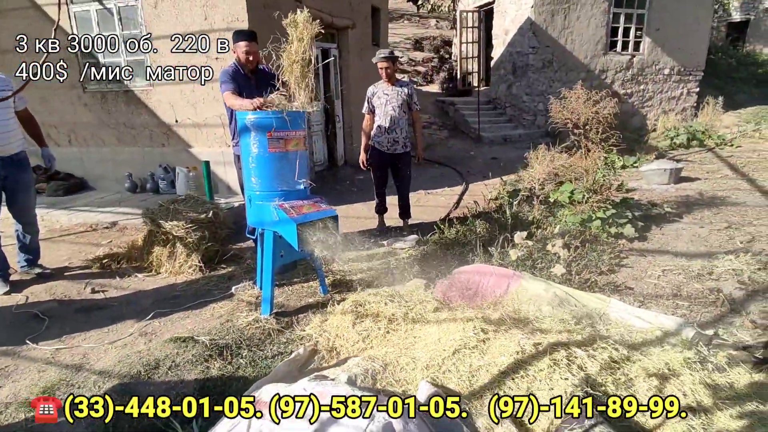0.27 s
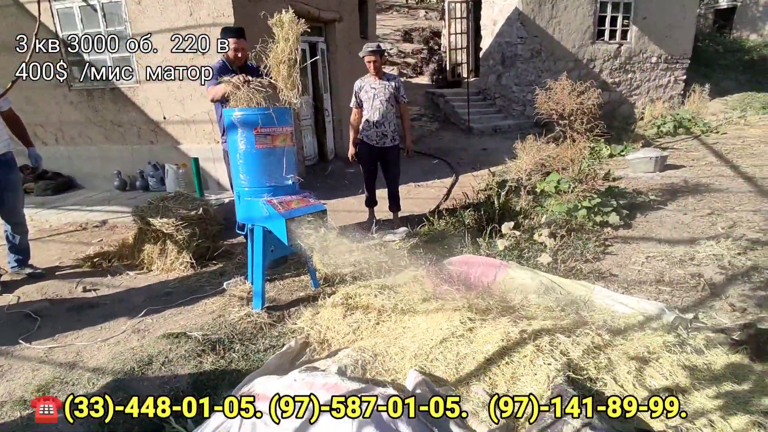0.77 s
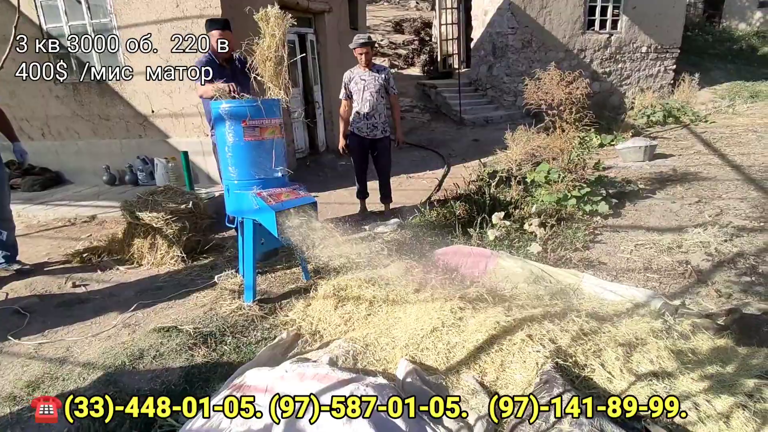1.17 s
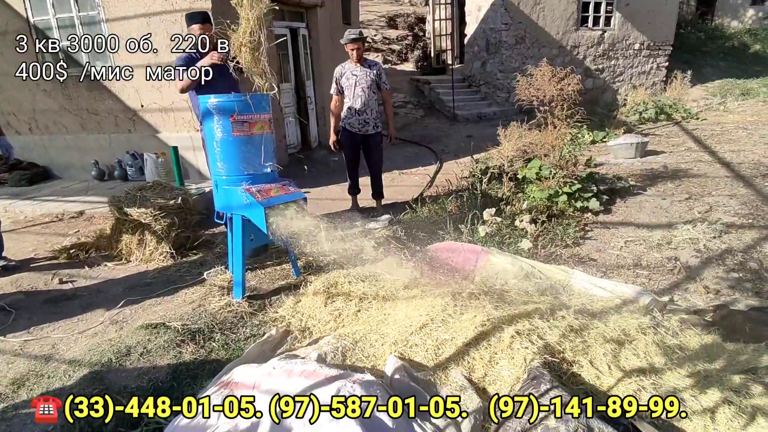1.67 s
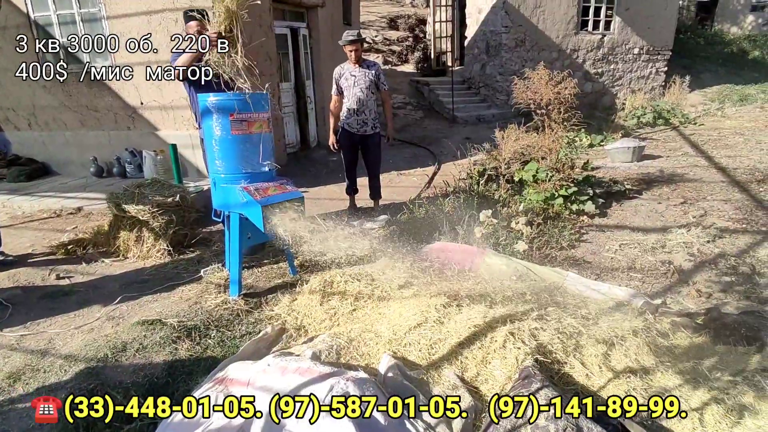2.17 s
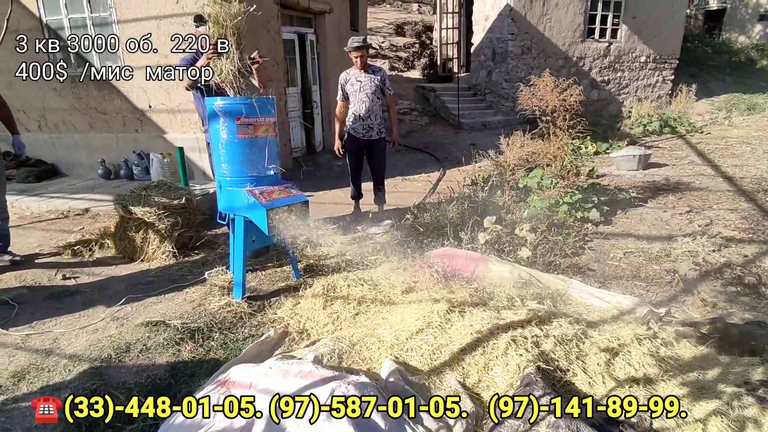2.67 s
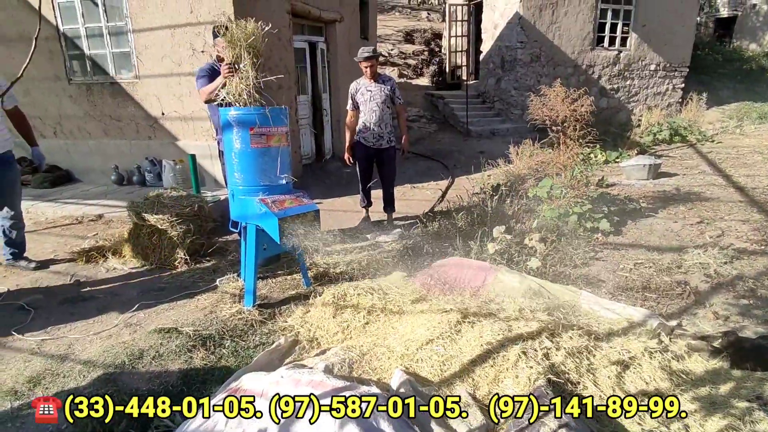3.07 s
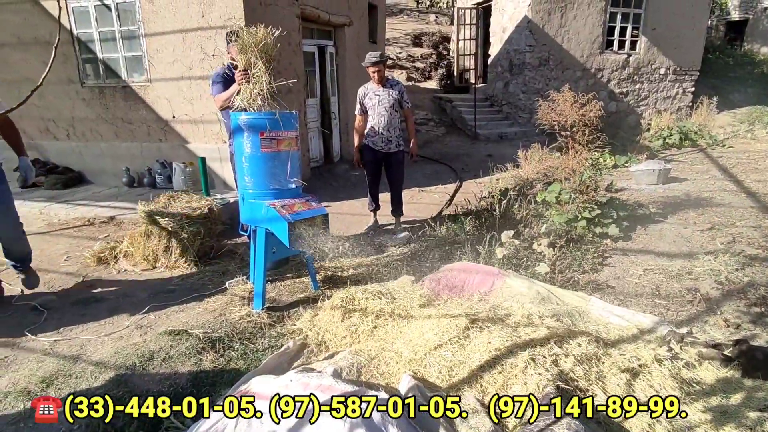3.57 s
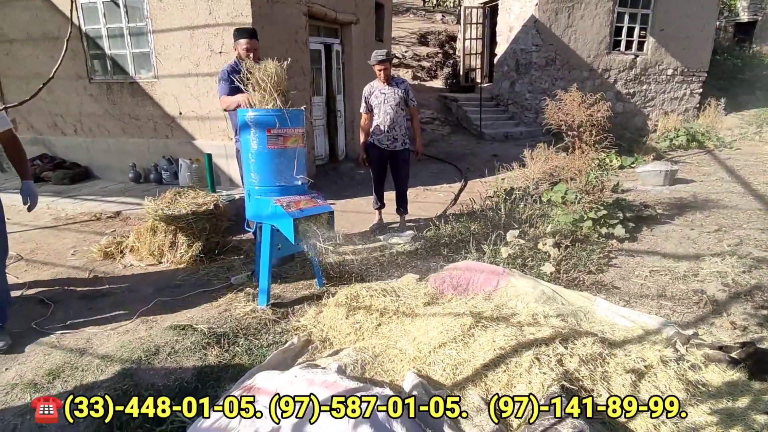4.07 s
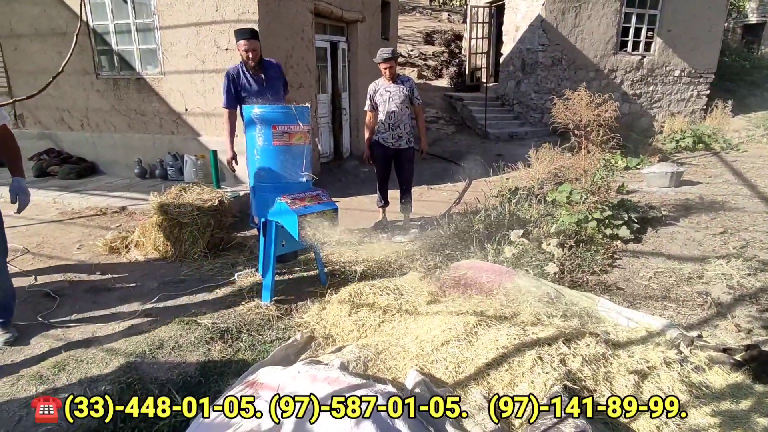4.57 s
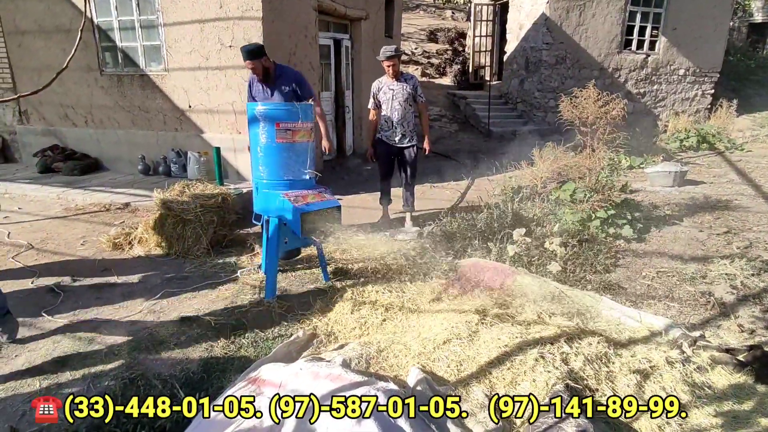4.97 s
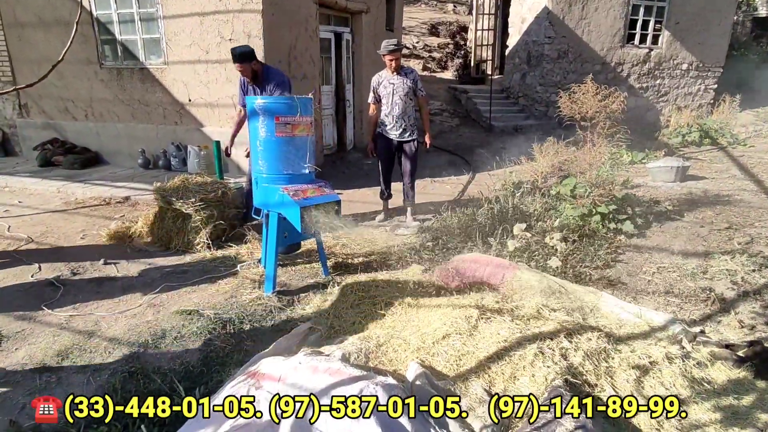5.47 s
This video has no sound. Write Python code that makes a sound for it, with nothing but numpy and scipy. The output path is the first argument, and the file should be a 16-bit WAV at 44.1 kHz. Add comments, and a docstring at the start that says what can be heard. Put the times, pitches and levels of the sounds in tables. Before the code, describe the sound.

A few metres away in an open yard, an electric straw chopper runs throughout with a tonal motor whine and a hollow steel-drum roar. Bright, dry hiss surges as tufts go in, with crunching, clicks and sharp snaps. The pitch sags near two seconds, recovers around three and dips again after four and a half. Wind rumbles and thumps a hand-held stereo microphone, especially on the right.

```python
"""Straw chopper in a yard

An electric straw chopper a few metres from a two-port microphone, in a breeze. Rotor: tones on multiples of a
shaft speed that sags as bundles are fed in. Drum: noise ringing in steel. Straw: ticking noise for chaff and
crushed stalks, short clicks for splinters, noise bursts for snaps. Wind: low noise in gusts, different at each
port, with sharp eddies thumping the right one."""
import sys
import numpy as np
from scipy import signal
from scipy.fft import rfft, irfft
from scipy.io import wavfile

SR = 44100
rng = np.random.default_rng(int(sys.argv[2]) if len(sys.argv) > 2 else 0)


def file_out(sig):
    """Save sig as 16-bit WAV at sys.argv[1]."""
    # one column per channel
    cols = np.atleast_2d(sig).T
    # limit, then scale
    lim = np.clip(cols, -1, 1)
    pcm = np.round(lim * 32767).astype(np.int16)
    wavfile.write(sys.argv[1], SR, pcm)


N = 251811
T, HZ = np.arange(N) / SR, np.fft.rfftfreq(N, 1 / SR)


def gain_of(db):
    """Decibels to amplitude."""
    return 10 ** (np.asarray(db) / 20)


def evened(x):
    """Scales to an rms of 1."""
    return x / np.sqrt(np.mean(x ** 2) + 1e-20)


def curves(rows):
    """Each column of a time table at every sample."""
    s, *columns = np.transpose(rows)
    return [np.interp(T, s, c) for c in columns]


def spectra(rows):
    """Each column of a frequency table at every bin, interpolated over log frequency."""
    hz, *columns = np.transpose(rows)
    return [np.interp(np.log(HZ + 1), np.log(hz), c) for c in columns]


def coloured(x, gain):
    """Filters by a gain per bin."""
    return irfft(rfft(x) * gain, N)


def bell(hz, width_hz):
    """Power response of one resonance."""
    return 1 / (1 + (2 * (HZ - hz) / width_hz) ** 2)


def wander(rate_hz):
    """Slow chance of rms 1, up to about a given rate."""
    return evened(coloured(rng.standard_normal(N), 1 / (1 + (HZ / rate_hz) ** 4)))


def sides(pan_db):
    """Left and right gains of equal total power, for a left-right difference in dB."""
    pair = np.array([gain_of(pan_db / 2), gain_of(-pan_db / 2)])
    return pair / np.sqrt(np.mean(pair ** 2, 0))


def swell(start, length, attack_s, release_s):
    """Rises, holds until its length is over, and dies away."""
    age = T - start
    return np.clip(age / attack_s, 0, 1) * np.exp(-np.clip((age - length) / release_s, 0, 30))


def crackle(ticks_per_s, spread_db, tick_s, tick_share):
    """A pair of noises made partly of tiny ticks at shared moments: many faint, a few strong."""
    struck = rng.random(N) < ticks_per_s / SR
    size = gain_of(spread_db * np.minimum(rng.exponential(1, N), 4)) * struck
    ticks = signal.lfilter([1], [1, -np.exp(-2 / (tick_s * SR))], size ** 2)  # power of decaying ticks
    share = np.clip(tick_share, 0, 1)
    power = 1 - share + share * ticks / ticks.mean()
    return np.sqrt(power) * rng.standard_normal((2, N))


# the two ports of the microphone at the usual lag:
# (frequency [Hz], likeness [0-1], phase by which left leads [radians], left-right level [dB])
PORT_PAIR = [(100, .9, -.2, -2), (300, .95, -.25, -.5), (560, .92, -.85, -2), (900, .92, -1, -1.5),
             (1170, .8, -1.6, 3), (1400, .72, -2.2, -1), (1900, .62, -3.1, 0), (2200, .62, -6.1, 0),
             (2750, .2, -7.6, -.5), (3100, .45, -8.9, 0), (3330, .995, -9.35, 0), (3600, 1, -9.42, 0),
             (3880, .995, -9.5, 0), (4250, .45, -9.9, 0), (4800, .25, -10.8, 0), (5800, .43, -12.6, 0),
             (9500, .08, -14, 0)]


def at_ports(pair, lag, diffuse=1, widest_phase=np.inf):
    """Direct sound reaches the right port first, by a drifting lag; scattered sound differs between ports."""
    hz, s, (direct, scattered) = signal.stft(pair, SR, nperseg=512, noverlap=384)
    stretch = np.interp(s, T, lag)
    at, *columns = np.transpose(PORT_PAIR)
    log_hz = np.log(hz[:, None] * stretch + 1)  # a longer lag slides the port pattern down in pitch
    likeness, phase, pan_db = [np.interp(log_hz, np.log(at), c) for c in columns]
    apart = diffuse * (1 - np.clip(likeness, 0, 1) ** 2)
    mixed = np.sqrt(1 - apart) * direct + np.sqrt(apart) * scattered
    right = mixed * np.exp(1j * np.minimum(-phase, widest_phase))
    ports = np.array([direct, right]) * sides(pan_db)
    return signal.istft(ports, SR, nperseg=512, noverlap=384)[1][:, :N]


# the lag between the ports drifts over time: (time [s], lag between the ports [relative to usual])
DRIFTING_LAG = [(0, 0.88), (.6, 0.96), (1.1, 0.99), (1.85, 1.087), (2.2, 1.05), (2.55, 1.127), (2.9, 1.03),
                (3.38, 0.92), (3.55, 0.99), (3.95, .97), (4.1, 0.9), (4.48, 0.998), (4.7, 0.93), (5, .95),
                (5.25, 0.88), (5.45, .95), (5.71, 0.9)]
LAG_FLUTTER, LAG_FLUTTER_HZ = 0.018, 10  # rms of the lag's quick flutter, relative to usual, and its rate


def drifting_lag():
    """Lag between the ports, relative to usual, drifting slowly and fluttering quickly."""
    return curves(DRIFTING_LAG)[0] + LAG_FLUTTER * wander(LAG_FLUTTER_HZ)


# shaft speed: (time [s], rotor speed [turns/s])
ROTOR_SPEED = [(0.0, 49.16), (0.78, 48.51), (0.87, 47.97), (1.08, 48.18), (1.29, 47.72), (1.54, 48.38),
               (1.67, 47.11), (1.76, 46.99), (2.06, 44.95), (2.29, 44.61), (2.49, 46.17), (3.2, 48.71),
               (3.45, 49.06), (4.34, 49.31), (4.53, 47.14), (4.92, 47.79), (5.05, 47.48), (5.71, 48.73)]
# strong blade tones, each swelling as the speed carries it onto a resonance of the housing:
# (multiple of rotor speed, rounded for pitch [1], level on resonance [dB], resonance [Hz], width [Hz],
#  rms of slow fading, sign irrelevant [dB], extra level at the outset [dB])
BLADE_TONES = [(3, -38.5, 138.1, 24, 0.5, -1), (5, -40, 240, 6, 1, 2), (6, -43.5, 284, 47, 2.5, 2),
               (12, -39, 592, 26.6, 1.2, 6.5), (17.6, -36, 852.6, 96, 2, 0.5),
               (23.9, -39.5, 1074, 540, 2.1, -0.5), (30, -54, 1462, 70, 1.5, 9),
               (34, -47.5, 1672, 15, -1, 2)]
# rotor imbalance and weaker blade tones: (multiple of rotor speed [1], level [dB])
ROTOR_HUM = [(1, -59), (2, -51), (4, -60), (7, -51), (16, -48.5), (22, -50), (28, -52.5), (44, -50)]
OUTSET_S, SETTLE_S = 0.75, 1  # the opening balance of the tones holds, then settles
FADE_HZ = 4.1
BLUR_ORDER = 17  # multiple of the shaft speed at which a blade tone's waver has doubled


def rotor(lag, blade_waver=.08, hum_waver=.26, waver_hz=9):
    """Tones locked to the shaft; straw on the blades makes each waver, high blade tones more than low."""
    speed = curves(ROTOR_SPEED)[0]
    angle = 2 * np.pi * np.cumsum(speed) / SR

    def tone(order, waver):
        """One multiple of the shaft speed, rms near 1, wavering in level and phase."""
        turn = order * angle + 2 * np.pi * rng.random()
        in_step = (1 + waver * wander(waver_hz)) * np.cos(turn)
        out_of_step = waver * wander(waver_hz) * np.sin(turn)
        return np.sqrt(2) * (in_step + out_of_step)

    blades = np.zeros(N)
    outset = np.clip(1 - (T - OUTSET_S) / SETTLE_S, 0, 1)
    for k, db, hz, width, fade_db, outset_db in BLADE_TONES:
        resonance = 1 / (1 + (2 * (round(k) * speed - hz) / width) ** 2)
        level = gain_of(db + outset_db * outset + fade_db * wander(FADE_HZ))
        waver = blade_waver * (1 + (k / BLUR_ORDER) ** 2)
        blades += resonance * level * tone(round(k), waver)
    hum = sum(gain_of(db) * tone(round(k), hum_waver) for k, db in ROTOR_HUM)
    return at_ports(np.array([blades + hum] * 2), lag, diffuse=0, widest_phase=1.57)


# trickle of straw through the knives: (time [s], flow level [dB])
STRAW_TRICKLE = [(0, -22.5), (.95, -23), (1.8, -24.5), (2.8, -24.5), (3.05, -27), (3.45, -25.5),
                 (3.7, -26.5), (4.3, -28), (4.5, -24), (5.2, -21), (5.45, -25.5), (5.71, -24.5)]
# a tuft is drawn in and sprayed out: (start [s], length [s], flow level [dB])
STRAW_TUFTS = [(-0.033, 0.041, -18), (0.135, 0.1, -21), (0.32, 0.28, -22.5), (0.724, 0.14, -19),
               (1.022, 0.26, -24), (1.507, 0.14, -20), (1.717, 0.4, -21), (2.189, 0.077, -20.5),
               (2.49, 0.13, -23.5), (2.678, 0.04, -22), (2.788, 0.068, -25.5), (4.338, 0.14, -19),
               (4.478, 0.1, -21), (4.63, 0.11, -24.5), (4.906, 0.094, -19), (5.02, 0.045, -22.5),
               (5.529, 0.06, -21.5)]
TUFT_ATTACK_S, TUFT_RELEASE_S = 0.064, 0.039


def straw_flow():
    """Level of the passing straw in dB: the powers of the trickle and every tuft add."""
    power = gain_of(curves(STRAW_TRICKLE)[0]) ** 2
    for s, length, db in STRAW_TUFTS:
        power += (gain_of(db) * swell(s, length, TUFT_ATTACK_S, TUFT_RELEASE_S)) ** 2
    return 10 * np.log10(power)


# spectrum of the rushing air, before the roar is levelled: (frequency [Hz], relative density [dB per Hz])
AIR_SPECTRUM = [(20, 5), (100, -16), (200, -37), (540, -46), (1300, -11.5), (2200, -12.5), (4000, -26.5),
                (12000, -39)]
# resonances of the drum, before the roar is levelled: (frequency [Hz], width [Hz], relative level [dB])
DRUM_MODES = [(138, 11, -0.5), (297.3, 16.7, 5), (342, 35, 1.5), (444, 24, -1.5), (712, 60, -1),
              (763, 90, 0), (877, 123, 0), (1103, 143, -2.5), (1335, 200, -6.5), (1457, 44, -8.5),
              (1590, 280, -10.5)]
# the drum roars at AIR_DB when the flow is at IDLE_FLOW_DB, and grows by a share of each dB more
AIR_DB, IDLE_FLOW_DB, AIR_PER_FLOW = -32.5, -25.5, 0.6


def drum(flow_db, lag, flutter_db=2.5, flutter_hz=22):
    """Turbulent air rings the steel drum; each resonance swells and fades by itself."""
    air = coloured(rng.standard_normal((2, N)), gain_of(spectra(AIR_SPECTRUM)[0]))
    for hz, width, db in DRUM_MODES:
        ringing = coloured(rng.standard_normal((2, N)), np.sqrt(bell(hz, width)))
        air += ringing * gain_of(db + flutter_db * wander(flutter_hz))
    roar_db = AIR_DB + AIR_PER_FLOW * (flow_db - IDLE_FLOW_DB)
    return at_ports(evened(air) * gain_of(roar_db), lag)


# spectrum of the flying straw: (frequency [Hz], relative density [dB per Hz])
STRAW_SPECTRUM = [(300, -54), (1000, -35), (1700, -8), (2800, -12), (3300, -1), (5000, -1), (7000, 2.5),
                  (9000, 0.5), (11000, -1.5), (12500, -2), (14300, -7)]


def straw_colour(x):
    """The bright spectrum of dry stalks, as a filter of unit rms gain."""
    return coloured(x, evened(gain_of(spectra(STRAW_SPECTRUM)[0])))


# bounds between sizes of fragment, from coarse bits to dust: (frequency [Hz])
CHAFF_SPLITS = [4950, 7100, 9050, 11700]
CHAFF_CLUMP_DB = 1.3  # rms


def chaff(flow_db, lag, level_db=-0.85, clump_hz=50):
    """Countless fragments hiss out and tick on the steel; coarse bits, flakes and dust clump separately."""
    spray = crackle(ticks_per_s=1800, spread_db=4.0, tick_s=0.00071, tick_share=0.11)
    hiss = at_ports(straw_colour(spray * gain_of(flow_db + level_db)), lag)
    below = [coloured(hiss, 1 / (1 + (HZ / hz) ** 12)) for hz in CHAFF_SPLITS]
    bands = np.diff([0 * hiss, *below, hiss], axis=0)
    return sum(band * gain_of(CHAFF_CLUMP_DB * wander(clump_hz)) for band in bands)


# resonances of crushed stalks, their bells squared in power:
# (frequency [Hz], width of the plain bell [Hz], relative level [dB])
CRUSHED_STALKS = [(1650, 200, 15.5), (3000, 4800, 9), (4650, 10000, 6.5)]
CRUNCH_PER_FLOW = 0.35  # dB of crunch for each dB of flow
CRUNCH_CLUMP_DB = 2.2  # rms


def crunch(flow_db, lag, level_db=-12.0, clump_hz=30):
    """The knives crush whole stalks inside the drum: coarser and lower than the chaff."""
    load_db = IDLE_FLOW_DB + CRUNCH_PER_FLOW * (flow_db - IDLE_FLOW_DB)
    grains = crackle(ticks_per_s=170, spread_db=6.0, tick_s=0.0084, tick_share=0.18)
    body = np.sqrt(sum(gain_of(db) ** 2 * bell(hz, width) ** 2 for hz, width, db in CRUSHED_STALKS))
    crush_db = load_db + level_db + CRUNCH_CLUMP_DB * wander(clump_hz)
    crushed = evened(coloured(grains, body)) * gain_of(crush_db)
    return at_ports(crushed + splinters(load_db), lag)


SPLINTER_RING_S = 0.002  # decay of the lowest click; higher ones die sooner


def splinters(flow_db, level_db=-16, per_s=90, low_hz=1700, high_hz=6000, count=16):
    """Thin stalks break one by one, each with a short click at one of several pitches."""
    age = np.arange(1024) / SR
    breaks = rng.random(N) < per_s / SR
    stalk, clicks = rng.integers(0, count, N), np.zeros((2, N))
    for k, hz in enumerate(np.geomspace(low_hz, high_hz, count)):
        pitch = hz / low_hz
        tone = np.sin(2 * np.pi * (hz * age + rng.random((2, 1))))
        ring = tone * np.exp(-age / SPLINTER_RING_S * pitch) * pitch
        for n in np.flatnonzero(breaks & (stalk == k)):
            clicks[:, n:n + len(age)] += ring[:, :N - n]
    return evened(clicks) * gain_of(flow_db + level_db)


# light breeze beneath the gusts: (time [s], level [dB])
LIGHT_BREEZE = [(0, -39), (1, -48), (1.7, -24), (2.1, -45), (2.4, -30), (2.7, -38), (2.95, -51),
                (3.15, -35), (3.35, -30.5), (3.7, -34), (4.4, -39.5), (5.71, -38)]
BREEZE_PAN_DB = -8.5  # left-right
# a gust reaches the microphone: (start [s], length [s], level [dB], left-right level [dB])
WIND_GUSTS = [(0.14, 0.058, -34.5, -9), (1.183, 0.051, -23, -17), (1.344, 0.21, -24.5, -17),
              (1.82, 0.16, -24.5, -13), (2.004, 0.049, -23, -9), (2.12, 0.1, -25.5, -24),
              (3.172, 0.068, -23.5, -5), (3.312, 0.11, -26.5, -5), (3.474, 0.077, -20.5, -3),
              (3.73, 0.11, -26.5, -4), (3.895, 0.12, -20, -12), (4.204, 0.093, -35, -20),
              (4.694, 0.054, -35, -15), (4.808, 0.035, -25, 10.5), (4.944, 0.14, -29, -22),
              (5.554, 0.11, -24, -9)]
GUST_ATTACK_S, GUST_RELEASE_S = 0.062, 0.022
# spectrum of wind on the ports: (frequency [Hz], relative density [dB per Hz])
WIND_RUMBLE = [(10, 2), (30, -1.5), (70, 2.5), (130, -2.5), (250, -14.5), (500, -57), (1500, -41),
               (8000, -90)]
# eddies that thump the right port: (time [s], peak before eddy_db is added [dB], half width [s])
PORT_EDDIES = [(1.454, -16, 0.00068), (1.488, -8.5, 0.0014), (1.893, -26, 0.00068), (1.919, -17, 0.0031),
               (1.935, -14, 0.00072), (2.011, -12, 0.00078), (2.07, -13.5, 0.0012), (2.237, -16, 0.00086),
               (3.529, -10, 0.001), (3.933, -9.5, 0.00048), (3.954, -10.5, 0.00058), (3.963, -12, 0.0012),
               (3.985, -12, 0.00069), (4.011, -6, 0.00089), (4.018, -8, 0.00032), (4.767, -16.5, .0015),
               (5.673, -10.5, 0.00084)]


def wind(lump_db=2.0, lump_hz=30, eddy_db=5.0):
    """Lumpy rumble that swells in gusts, unrelated at the two ports, with a few sharp eddies."""
    power = (sides(BREEZE_PAN_DB)[:, None] * gain_of(curves(LIGHT_BREEZE)[0])) ** 2
    for s, length, db, pan_db in WIND_GUSTS:
        gust = gain_of(db) * swell(s, length, GUST_ATTACK_S, GUST_RELEASE_S)
        power += (sides(pan_db)[:, None] * gust) ** 2
    lumps = gain_of(lump_db * np.array([wander(lump_hz), wander(lump_hz)]))
    rumble = evened(coloured(lumps * rng.standard_normal((2, N)), gain_of(spectra(WIND_RUMBLE)[0])))
    eddies = np.zeros(N)
    for s, peak_db, half_width in PORT_EDDIES:
        u = (T - s) / (2 * half_width)
        pulse = (1 - u ** 2) / (1 + u ** 2) ** 2  # a pressure peak between two shallow troughs
        eddies += gain_of(peak_db + eddy_db) * pulse
    return rumble * np.sqrt(power) + np.outer([0, 1], eddies)


BURST_ATTACK_S = 0.0025


def burst(s, decay_s):
    """Envelope of a sudden spray of splinters that dies away."""
    age = np.maximum(T - s, 0)
    return np.minimum(age / BURST_ATTACK_S, 1) * np.exp(-np.minimum(age / decay_s, 30))


# thick stalks snapping: (time [s], level before level_db is added [dB], left-right level in the treble [dB])
STALK_SNAPS = [(0.1763, -4, 25), (0.267, -5, 13), (0.435, -3.5, 12), (0.5514, -9, 4), (0.7286, -4.5, 5),
               (0.759, -14, -1), (1.0864, -9, 4), (1.7585, -21, 3), (1.976, -13, -1.5), (2.11, -10, 2.5),
               (2.354, -5, 3), (2.969, -6.5, 2), (3.09, -11, 17), (3.436, -5, 9), (3.887, -9, 13),
               (4.042, -13, 6), (4.112, -12, 10), (4.275, -11, 7), (4.489, -11, 8), (4.546, -11, -1),
               (4.676, -10, 0), (4.969, -11, 0), (5.379, -7, 16), (5.578, -9, -16), (5.682, -9, 19)]
SNAP_DECAY_S = 0.007
# a wad of straw hits the knives: (time [s], spray level [dB], decay [s], knock relative to the spray [dB])
STRAW_WADS = [(0.973, -11, 0.024, -9.5), (1.59, -20, 0.03, -8), (2.219, -34, .015, -13.5),
              (2.24, -20, .015, -7), (2.355, -26, .008, -15), (4.726, -34, .02, -4)]
SHADOW_HZ = 5000  # above this the microphone's body shades one port from a snap


def snaps(lag, level_db=-8, knock_hz=1750, knock_width_hz=1300, knock_s=0.026):
    """Single stalks crack sharply; a whole wad splinters unevenly and also knocks the drum."""
    power = np.zeros((2, N))
    for s, db, pan_db in STALK_SNAPS:
        power += (gain_of(db + level_db) * sides(pan_db)[:, None] * burst(s, SNAP_DECAY_S)) ** 2
    knocks = np.zeros(N)
    for s, db, decay, knock_db in STRAW_WADS:
        power += (gain_of(db) * burst(s, decay)) ** 2
        knocks += gain_of(db + knock_db) * burst(s, knock_s)
    grains = crackle(ticks_per_s=900, spread_db=5.0, tick_s=0.0015, tick_share=0.45)
    shreds = at_ports(straw_colour(grains), lag)
    unshaded = coloured(shreds, 1 / (1 + (HZ / SHADOW_HZ) ** 12))
    steel = coloured(knocks * rng.standard_normal((2, N)), evened(bell(knock_hz, knock_width_hz)))
    # below the shadow both ports get the weaker side's level
    spray = np.sqrt(power.min(0)) * unshaded + np.sqrt(power) * (shreds - unshaded)
    return spray + at_ports(steel, lag)


# the machine's level dips briefly; the first and last levels hold outside: (time [s], level [dB])
BRIEF_DIP = [(0.97, 1), (1.015, -5.5), (1.06, -2), (1.10, 3)]


def scene(uneven_db=0.5, uneven_hz=25):
    """The machine, driven by an uneven flow of straw, heard at a drifting lag between the ports; and the
    breeze."""
    flow_db = straw_flow() + uneven_db * wander(uneven_hz)
    lag = drifting_lag()
    machine = rotor(lag) + drum(flow_db, lag) + chaff(flow_db, lag) + crunch(flow_db, lag)
    return machine * gain_of(curves(BRIEF_DIP)[0]) + wind() + snaps(lag)


# each port's own resonance, left then right, its bell squared in power:
# (frequency [Hz], width of the plain bell [Hz], boost [dB])
PORT_RESONANCES = [(10160, 1880, 10), (7900, 1900, 3.5)]
EDGE_HZ = 14300  # upper band limit


def record(dry):
    """Each port rings in the treble; the highest peaks are rounded; then the band limit."""
    rings = [np.sqrt(1 + (gain_of(db) ** 2 - 1) * bell(hz, width) ** 2) for hz, width, db in PORT_RESONANCES]
    heard = coloured(dry, np.array(rings))
    rounded = heard / (1 + (heard / .8) ** 6) ** (1 / 6)  # never beyond 0.8
    low_pass = signal.firwin(801, EDGE_HZ, window=("kaiser", 9), fs=SR)
    return signal.oaconvolve(rounded, low_pass[None], "same")


dry = scene()
out = record(dry)
file_out(out)
```